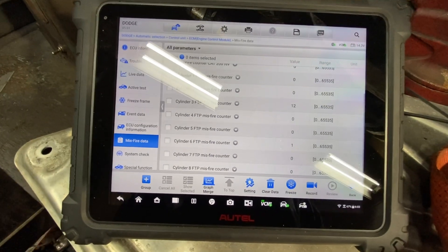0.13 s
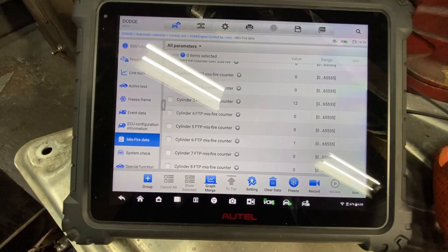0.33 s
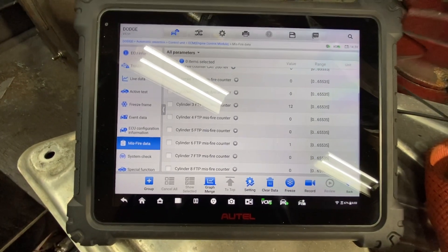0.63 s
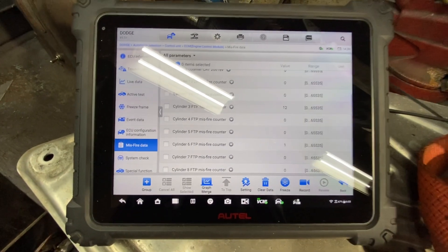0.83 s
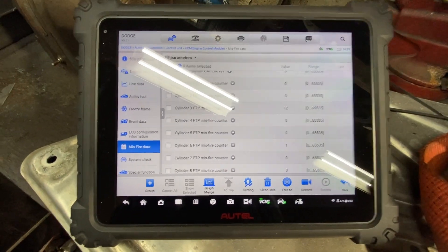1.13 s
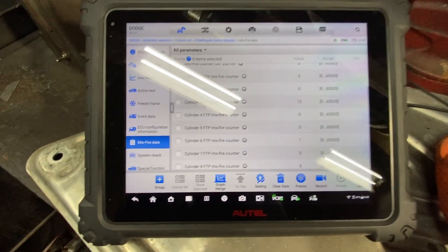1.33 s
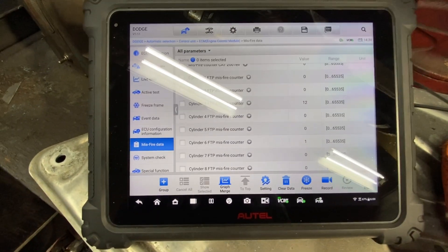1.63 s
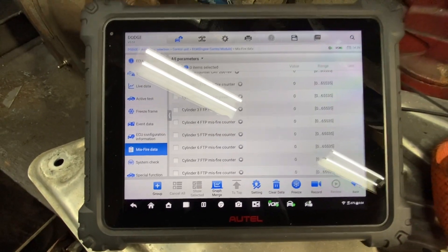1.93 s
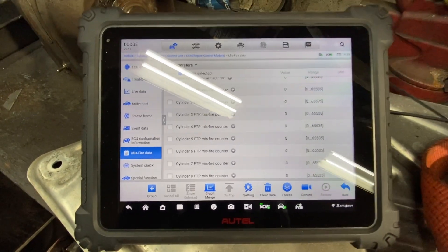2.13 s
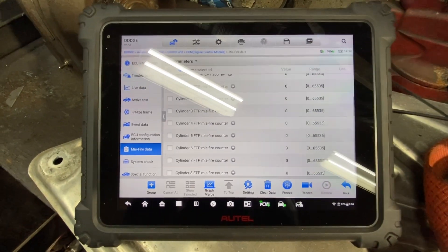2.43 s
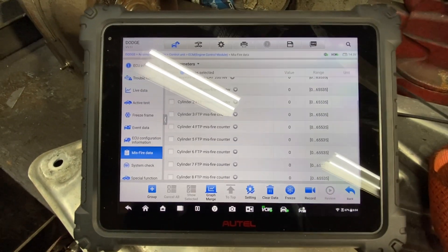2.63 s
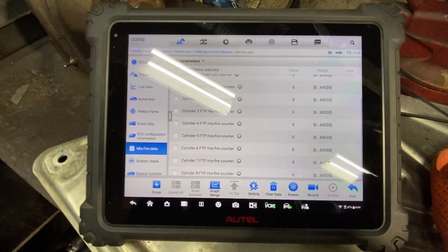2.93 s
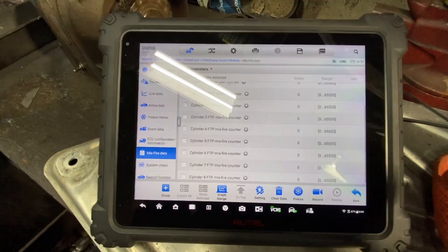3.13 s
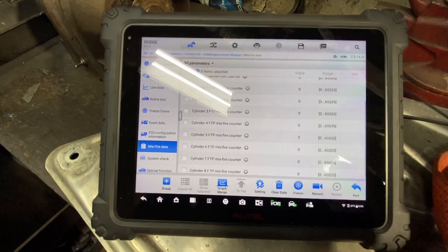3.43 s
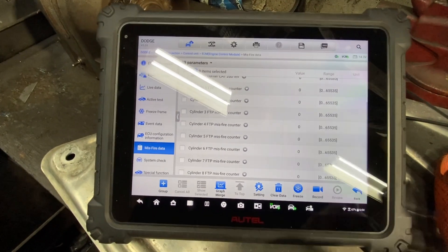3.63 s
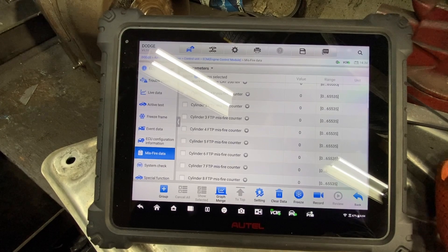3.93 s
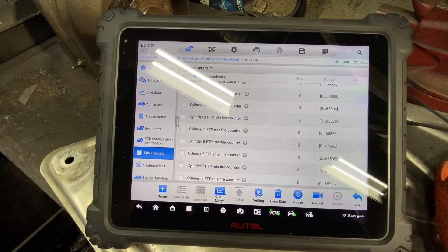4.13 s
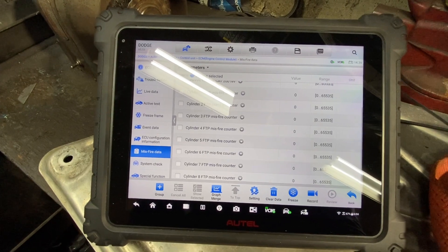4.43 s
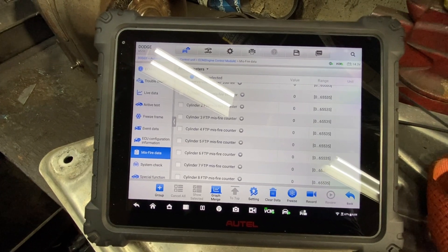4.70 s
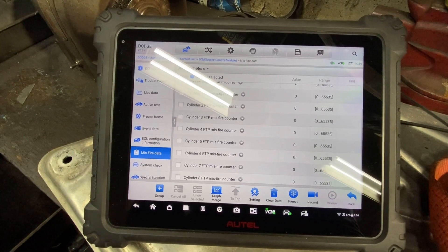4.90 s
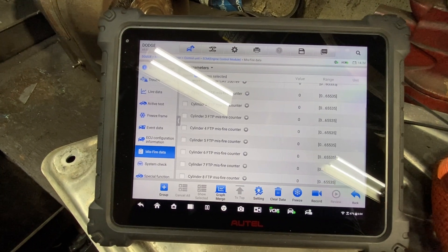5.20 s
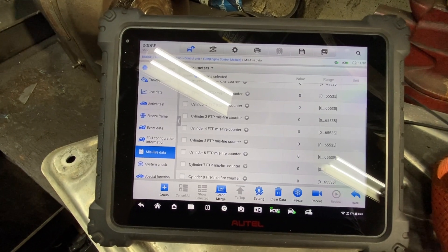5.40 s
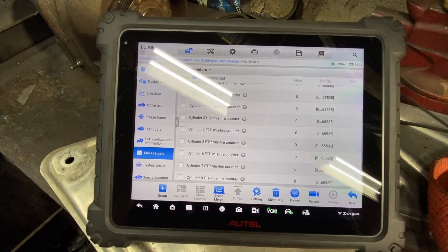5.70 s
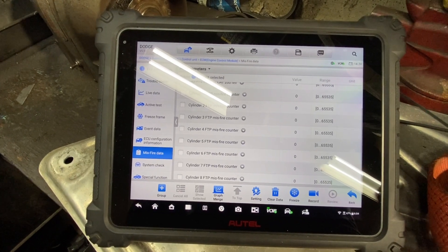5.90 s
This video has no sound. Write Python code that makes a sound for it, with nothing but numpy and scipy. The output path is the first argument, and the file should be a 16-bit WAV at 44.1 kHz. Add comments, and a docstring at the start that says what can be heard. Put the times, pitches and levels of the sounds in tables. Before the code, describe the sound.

A large V8 engine idles continuously in a workshop, heard close by on a hand-held phone. A dominant deep boom throbs fast with a slight recurring limp, over thuds, valve clatter, humming pulleys and belt and fan hiss. Small metallic clinks come around one to two seconds; the tone shifts slightly near three seconds as the phone moves, and more misfires roughen the later part.

```python
"""A deep boom with a limp: a large V8 idles in a workshop, heard from a hand-held phone beside it.
The exhaust booms at the firing rate, sagging at the weak cylinders, and chuffs once every two crank turns.
Firings thud and clatter through the ringing engine bay; block and pulleys hum, panels knock and ring,
and belts, fan and intake hiss. A few loose parts clink and tick; the worst misfires crowd in later on.
Each sound is built from tones or filtered noise, nearly all of them steered by one crankshaft."""
import sys
import numpy as np
from scipy import signal
from scipy.fft import rfft, irfft
from scipy.io import wavfile
from scipy.ndimage import uniform_filter1d, map_coordinates

SR = 44100
rng = np.random.default_rng(int(sys.argv[2]) if len(sys.argv) > 2 else 0)


def digitize_waveform(pressure):
    """Quantize a signal to 16-bit integers and store it at the path in sys.argv[1].

    Rows of a 2-D input are taken as channels; values are limited to [-1, 1].
    """
    field = np.atleast_2d(pressure).T
    bounded = np.clip(field, -1, 1)
    quanta = np.round(bounded * 32767).astype(np.int16)
    wavfile.write(sys.argv[1], SR, quanta)


N = 267113
TIME = np.arange(N) / SR  # s
FREQ = np.maximum(np.arange(N // 2 + 1) * SR / N, 1)  # Hz


def undb(db):
    """Turn decibels into a gain."""
    return 10 ** (np.asarray(db) / 20)


def level(x, db):
    """Bring a sound to rms 1, then apply a level in dB, fixed or moving."""
    return x * undb(db) / np.sqrt(np.mean(x ** 2))


def curves(table):
    """Join each column of a table by straight lines in time."""
    seconds, *columns = np.transpose(table)
    return [np.interp(TIME, seconds, column) for column in columns]


def slope_db(points):
    """Join a spectrum's points in dB by straight lines over log frequency."""
    hz, db = np.transpose(points)
    return np.interp(np.log(FREQ), np.log(hz), db)


def colour(x, response):
    """Filter a sound by a frequency response."""
    return irfft(rfft(x) * response, N)


def resonance(hz, width):
    """Response of one resonance, applied twice so that its sides are steep."""
    return (1 + 1j * (FREQ - hz ** 2 / FREQ) / width) ** -2


def blend(a, b, share):
    """Mix unrelated sounds; share is the first one's part of the power."""
    share = np.clip(share, 0, 1)
    return np.sqrt(share) * a + np.sqrt(1 - share) * b


def walk(rate):
    """Slow chance of rms 1: random levels, each held 1 / rate seconds, smoothed twice."""
    hold = int(SR / rate)
    held = rng.standard_normal(2048)[np.arange(N) // hold]
    smooth = uniform_filter1d(uniform_filter1d(held, hold), hold)
    return level(smooth, 0)


def per_cylinder(values, firing):
    """Glide smoothly through one value per cylinder, round and round."""
    return map_coordinates(values, [firing % 8], order=3, mode="grid-wrap")


def burst(firing, at, length):
    """Firings since a crank position, and a bell-shaped swell around it."""
    since = (firing - at + 4) % 8 - 4
    return since, np.exp(-.5 * (since / length) ** 2)


def moved():
    """How far the phone has got from its first place to its second, 0 to 1."""
    middle_s, duration_s = 2.89, 0.36
    return np.clip((TIME - middle_s) / duration_s + .5, 0, 1)


def both_ports(phase, apart):
    """A tone at the phone's two ports, put out of step (rad) by reflections."""
    return np.sin(phase + np.array([[1], [-1]]) * apart / 2)


def cycle_rattle(firing, size=8192):
    """A jumble of small impacts tied to crank angle, so it returns every eight firings."""
    jumble = irfft(np.exp(2j * np.pi * rng.random(size // 8)), size)
    return level(np.interp(firing / 8, np.arange(size) / size, jumble, period=1), 0)


def rattle(firing, repeat, likeness):
    """Part repeats with the crank, part is new each cycle; the room makes the two ports differ."""
    # once the phone has moved, the rattle arrives by other paths, so the pattern changes
    locked = [blend(cycle_rattle(firing), cycle_rattle(firing), moved()) for _ in range(3)]
    paths = blend(np.array(locked), rng.standard_normal((3, N)), repeat)
    return blend(paths[0], paths[1:], likeness)


def exhaust(firing, cylinder_db, lead, scatter_db=0.3, octave_db=-30.0):
    """The muffler leaves a nearly pure boom with a faint octave; weak firings come softer and late."""
    # how strongly the weak cylinders show (time [s], depth [1 = as in the cylinder table])
    limp_table = [(0, 0.69), (2.2, 0.73), (4.2, 0.76), (5.3, 0.58), (6.06, 0.63)]
    # the worst misfires, where the boom drops further (time [s], dip [dB])
    misfires = [(0.674, -2.5), (3.652, -1), (4.46, -1), (4.692, -1), (4.806, -2.4), (4.923, -1),
                (5.155, -3), (5.271, -1.5), (5.385, -2.5), (5.621, -1.4)]
    # what the muffler lets through (frequency [Hz], gain [dB])
    muffler = [(30, -22), (44, 3), (70, -0.5), (104, 0)]
    misfire_s, jitter_rad, octave_apart_rad, boom_db = 0.0058, .03, 1.1, -12.5
    limp, = curves(limp_table)
    dip_db = sum(db * np.exp(-.5 * ((TIME - s) / misfire_s) ** 2) for s, db in misfires)
    phase = 2 * np.pi * firing + limp * lead + jitter_rad * walk(45)
    octave = undb(octave_db) * both_ports(2 * phase, octave_apart_rad)
    strength = undb(limp * cylinder_db + dip_db + scatter_db * walk(35))
    boom = strength * (np.cos(phase) + octave)
    return level(colour(boom, undb(slope_db(muffler))), boom_db)


def rumble(firing):
    """The pipe rumbles unevenly: rattle narrowed to a low resonance."""
    pipe_hz, width_hz, rumble_db = 114, 30, -46
    shaking = rattle(firing, repeat=0.44, likeness=0.65)
    return level(colour(shaking, resonance(pipe_hz, width_hz)), rumble_db)


def bay_response():
    """Every resonance of the bay lifts or dips its own narrow band and rings on."""
    # resonances of the engine bay and its panels (frequency [Hz], width [Hz], lift [dB])
    bay_table = [(238, 2.5, 6.5), (278.7, 15, 6.5), (321, 2.2, 14), (321.5, 13, -6), (368.4, 5.8, 8.5),
                 (407, 6.4, 10.5), (480, 8.1, -0.5), (502.5, 7, 1.5), (558.4, 7, 5), (694, 38, 7.5),
                 (749, 15.4, 8), (780, 13, 11.5), (790, 13, 5), (891, 16.5, 15), (953, 20, 4),
                 (1028, 81, 7), (1213, 8.6, 9.5), (1385, 22, 12.5), (1597, 30, 10), (1810, 90, 6),
                 (2156, 19, 7), (2383, 40, 11.5), (2572, 35, 15), (2820, 27, 14.5)]
    response = 1
    for hz, width, db in bay_table:
        response = response * (1 + (undb(db) - 1) / (1 + 1j * (FREQ - hz ** 2 / FREQ) / width))
    return response


def thuds(firing, cylinder_db, bay):
    """Combustion shakes the block low down, and the bay rings with it."""
    # spectrum of the shaking, before the bay adds its ring (frequency [Hz], level [dB])
    thud_spectrum = [(20, -18), (45, -16), (85, -0.5), (132, -4), (158, -6.5), (205, -12.5), (265, -5),
                     (360, -5), (440, -8.5), (580, -9), (800, -16), (1500, -57)]
    # slow rise and fall around the usual level, softest a little after the middle (time [s], level [dB])
    thud_swell = [(0, 0.5), (1.5, -0.5), (2.6, 0.3), (3.3, -0.8), (4.7, 0.1), (6.06, 0.5)]
    flicker_db, thud_db = .3, -32
    shaking = rattle(firing, repeat=.48, likeness=0.35) * undb(cylinder_db + flicker_db * walk(50))
    swell_db, = curves(thud_swell)
    return level(colour(shaking, bay * undb(slope_db(thud_spectrum))), thud_db + swell_db)


def valve_clatter(firing, cylinder_db, bay):
    """The valve gear clatters higher up, through the same ringing bay."""
    # spectrum of the clatter, before the bay adds its ring (frequency [Hz], level [dB])
    clatter_spectrum = [(300, -16), (600, -12), (740, -4), (900, -1.5), (1080, -1), (1280, -10),
                        (2000, -11.5), (2600, -16.5), (3200, -20), (6000, -47)]
    flicker_db, swell_db, clatter_db = .8, .45, -34
    strength = undb(cylinder_db + flicker_db * walk(110) + swell_db * walk(15))
    clatter = rattle(firing, repeat=.2, likeness=0.066) * strength
    return level(colour(clatter, bay * undb(slope_db(clatter_spectrum))), clatter_db)


def wavering_tone(firing_hz, hz, waver_db=2, slip=0.27, loosen=0.38):
    """A tone following engine speed, wavering in level and phase (rad), more in phase after the move."""
    spread_rad_per_hz = .0013  # higher tones are further out of step between the ports
    idle_time = np.cumsum(firing_hz / firing_hz.mean()) / SR
    phase = 2 * np.pi * (hz * idle_time + rng.random()) + (slip + loosen * moved()) * walk(7)
    tone = both_ports(phase, spread_rad_per_hz * hz)
    return level(tone * undb(waver_db * walk(7.0)), 0)


def hums(firing, firing_hz):
    """Block and pulleys hum in step with engine speed, roughened by the shaking of each cycle."""
    # hums at mean idle speed (frequency [Hz], level [dB], left minus right [dB])
    hum_table = [(225.5, -48.5, 2.5), (290.5, -42.8, -2), (312.5, -45, 3), (340.5, -46, -2), (368, -44, 3),
                 (409, -46, -10), (463.6, -52.5, 12), (512, -53.5, -8), (755, -48.5, 9), (801, -46, -1)]
    roughness = .2
    out = 0
    for hz, db, pan_db in hum_table:
        shake = 1 + roughness * per_cylinder(rng.standard_normal(8), firing)
        hum = level(wavering_tone(firing_hz, hz) * shake, db)
        out = out + hum * undb(np.array([[pan_db], [-pan_db]]) / 2)
    return out


def off_the_walls(x):
    """Short reflections colour each port in its own fine way."""
    share, decay_s = .09, .016
    echoes = rng.standard_normal((2, N)) * np.exp(-TIME / decay_s)
    echoes /= np.linalg.norm(echoes, axis=1, keepdims=True)
    return blend(colour(x, rfft(echoes)), x, share)


def hiss(cylinder_db, likeness=0.056):
    """Belts, fan and intake: a broad hiss of noise that flutters a little and flares now and then."""
    # spectrum of the hiss (frequency [Hz], level [dB])
    hiss_spectrum = [(300, 4.5), (1200, 3.5), (2500, -1), (3200, -3), (4600, -3.5), (5080, 0), (5550, -4.5),
                     (6200, -3), (7200, -3.5), (8200, -8.5), (9600, -11.5), (11200, -8), (12500, -13)]
    # brief flares (time [s], lift [dB], decay [s])
    flares = [(0.945, 3.2, 0.04), (1.37, 5.3, 0.075), (1.822, 3.5, 0.035)]
    # slow rise and fall of the hiss, highest while the phone moves (time [s], level [dB])
    treble = [(0, 0), (1.9, -0.1), (2.3, 0.3), (2.85, 0.8), (3.05, -0.5), (4, -0.2), (6.06, 0)]
    flicker_db, hiss_db = .35, -35.5
    noise = rng.standard_normal((3, N))
    air = colour(blend(noise[0], noise[1:], likeness), undb(slope_db(hiss_spectrum)))
    flare_db = sum(db * (TIME > s) * np.exp(-np.abs(TIME - s) / decay) for s, db, decay in flares)
    treble_db, = curves(treble)
    air = air * undb(cylinder_db + treble_db + flare_db + flicker_db * walk(150))
    return level(off_the_walls(air), hiss_db)


def passing_rings(firing):
    """Standing waves, stirred by the rattle, swell and fade as the phone drifts through them."""
    # narrow resonances (middle [s], half length [s], frequency [Hz], width [Hz], level at the middle [dB])
    ring_table = [(.4, .77, 567, 28, -48), (1.3, .45, 946, 28, -41.5), (1.25, .5, 1218, 24, -48.5),
                  (2.4, .38, 700, 50, -40), (3.8, 1, 901, 8, -43.5), (3.9, 1, 800, 9, -47.5),
                  (1.2, 1, 801, 9, -46.5), (1.2, 1.5, 289, 8, -49), (2.3, .6, 367, 8, -42.5)]
    shaking = rattle(firing, repeat=0.23, likeness=0.51)
    out = 0
    for s, half, hz, width, db in ring_table:
        ring = level(colour(shaking, resonance(hz, width)), db)
        out = out + ring * np.exp(-.5 * ((TIME - s) / half) ** 4)
    return out


def knocks(firing, firing_hz):
    """Moving parts set panels ringing at their own crank angles, a little differently each time."""
    # one ring per cycle each; the last is a long glide, so each cycle whoops upward
    # (crank position [firings], length [firings], frequency [Hz], rise [Hz per firing],
    #  level before the phone moves [dB], level after [dB], phase between the ports [rad])
    knock_table = [(1.65, .45, 245, 0, -49.5, -50, .4), (5.3, .42, 250, 0, -48.5, -49.5, .4),
                   (.95, .45, 318, 0, -48, -42, .6), (2.7, .6, 375, 20, -44.5, -45, .7),
                   (3.8, .55, 308, 0, -53, -45, .5), (5, .3, 320, 0, -47, -48, .6),
                   (4.7, .45, 385, 0, -48.5, -53, .7), (6.2, .4, 345, 0, -52, -48, .7),
                   (7.6, .3, 380, 0, -51, -51, .7), (1.9, .6, 505, 0, -51, -50, 1),
                   (1.25, .4, 780, 0, -46.5, -47.5, 1.5), (2.65, .55, 752, 0, -44, -50, 2),
                   (4.4, 1.5, 818, 40, -45, -39, 1.6)]
    scatter_db, slip_rad = 1.2, .25
    out = 0
    for at, length, hz, rise, before_db, after_db, apart in knock_table:
        since, swell = burst(firing, at, length)
        turns = (hz + rise * since / 2) * since / firing_hz + rng.random()
        ring = both_ports(2 * np.pi * turns + slip_rad * walk(8.4), apart)
        strength = swell * undb(scatter_db * walk(11))
        out = out + level(ring * strength, before_db + (after_db - before_db) * moved())
    return out


def chuff(firing, firing_hz, at=2.746, early_length=1.2, late_length=0.79, pipe_hz=121, db=-39.5):
    """Uneven firing leaves one lump of gas per cycle, never twice the same size, that rings the pipe."""
    # at, the lengths and the lag count firings
    lag, stretch_spread, scatter_db = .25, .15, 1.2
    length = early_length + (late_length - early_length) * moved()
    length = length * np.exp(stretch_spread * walk(10))
    since, swell = burst(firing, at + lag, length)
    ring = np.sin(2 * np.pi * pipe_hz * (since + lag) / firing_hz)
    return -level(swell * undb(scatter_db * walk(7.9)) * ring, db)


def clinks():
    """Each small loose part clinks or ticks: noise through a resonance, dying away quickly."""
    # (time [s], level at the start [dB], frequency [Hz], width [Hz], decay [s])
    clink_table = [(.946, -39, 1510, 400, .02), (.986, -36.5, 1200, 400, .03),
                   (1.372, -35.5, 1550, 420, .018), (1.821, -41.5, 4350, 1200, .016),
                   (1.841, -38, 1210, 400, .01), (3.654, -38, 4500, 4000, .005),
                   (3.854, -39, 4500, 4000, .005), (4.324, -38, 4000, 4000, .007),
                   (5.758, -30, 1100, 1200, .005), (5.829, -36, 1420, 700, .007)]
    out = 0
    for s, db, hz, width, decay in clink_table:
        noise = colour(rng.standard_normal((3, N)), resonance(hz, width))
        ring = level(blend(noise[0], noise[1:], 0.2), db)
        out = out + ring * (TIME > s) * np.exp(-np.abs(TIME - s) / decay)
    return out


def scene():
    """One crankshaft drives the boom, the hums, the knocks, the clatter and the pulse of the hiss."""
    # the idle hunts slowly up and down (time [s], firing rate [Hz])
    speed = [(0.0, 70.06), (0.56, 70.75), (1.32, 69.28), (2.65, 70.71), (3.3, 69.09), (4.57, 69.45),
             (5.73, 68.25), (6.06, 69.94)]
    # cylinders in firing order (boom [dB], boom lead [rad], thud [dB], clatter [dB], hiss [dB]);
    # the limp scales both boom columns
    cylinders = [(-0.44, -0.055, -5.5, 2, 0.5), (0.5, -0.035, 2.5, 1, 1.5), (0.5, -0.14, -1, 1.5, 0.5),
                 (-1, -0.18, 1.5, 0, 1.5), (1, 0.031, -2.5, 1.5, 0.5), (0.5, -0.099, -4, 1.1, 1.5),
                 (1.7, 0.02, 0, 1, 1.1), (-1.2, -0.35, -1, 2.2, 1.5)]
    firing_hz, = curves(speed)
    firing = np.cumsum(firing_hz) / SR - .05  # firings so far
    columns = np.transpose(cylinders)
    boom_db, lead, thud_db, clatter_db, hiss_db = (per_cylinder(c, firing) for c in columns)
    tailpipe = exhaust(firing, boom_db, lead) + rumble(firing) + chuff(firing, firing_hz)
    bay = bay_response()
    bay_noise = thuds(firing, thud_db, bay) + valve_clatter(firing, clatter_db, bay)
    block = hums(firing, firing_hz) + passing_rings(firing) + knocks(firing, firing_hz) + clinks()
    air = hiss(hiss_db)
    # the noise of the bay wanders as the hand-held phone sways
    sway_db, sway_per_s = .4, 2
    sway = undb(sway_db * walk(sway_per_s))
    # everything starts a little softer and settles at its full level
    start_db, settle_s = -2.5, 0.12
    settle = undb(start_db * np.exp(-TIME / settle_s))
    return settle * (tailpipe + block + sway * bay_noise + air)


def record(dry):
    """Each port of the phone has its own colour, the left one brighter; the phone cuts the top."""
    # (frequency [Hz], left minus right [dB])
    port_table = [(110, 1.5), (230, 1.5), (320, 2.5), (630, 0.5), (1100, 4), (2000, 6), (3000, 3.5),
                  (4300, 4.5), (5050, 8.5), (6000, 4.5), (7100, 9), (9000, 0)]
    top_hz = 12250
    ports = colour(dry, undb(np.outer([1, -1], slope_db(port_table)) / 2))
    low_pass = signal.ellip(8, .2, 70, top_hz, fs=SR, output="sos")
    return signal.sosfilt(low_pass, ports)


dry = scene()
out = record(dry)
digitize_waveform(out)
```